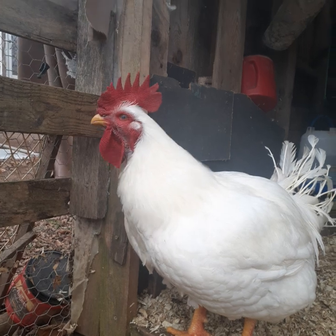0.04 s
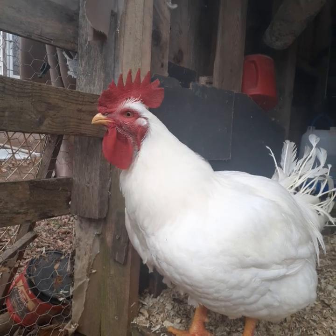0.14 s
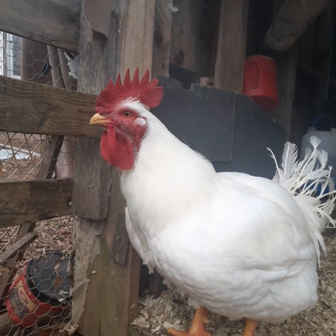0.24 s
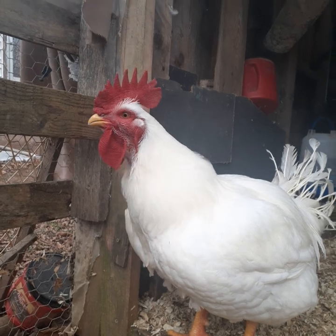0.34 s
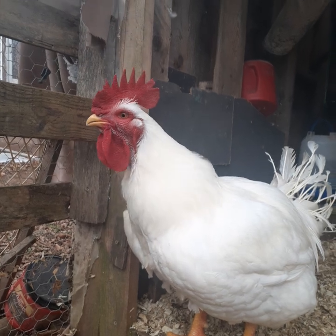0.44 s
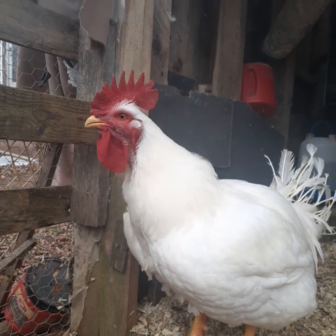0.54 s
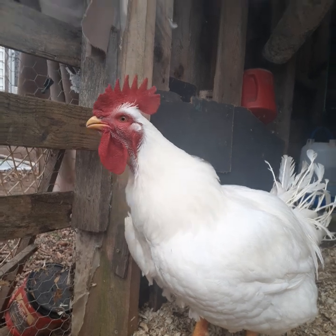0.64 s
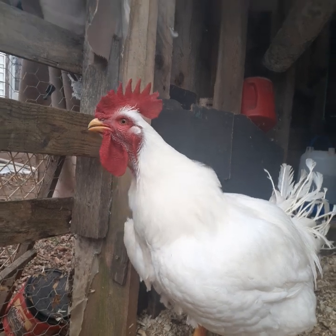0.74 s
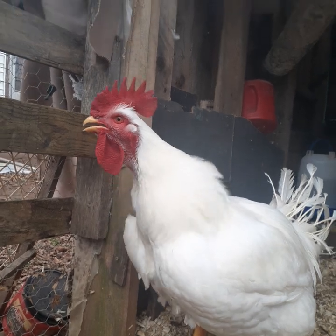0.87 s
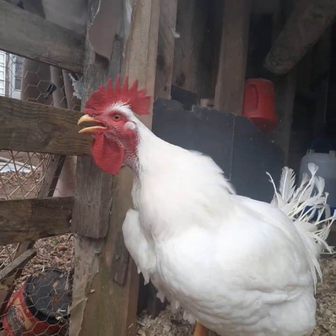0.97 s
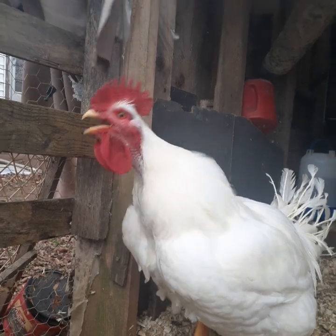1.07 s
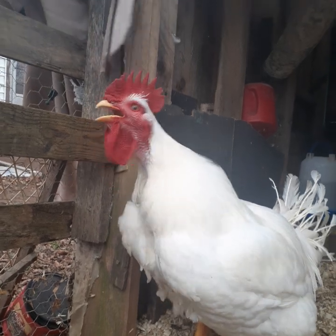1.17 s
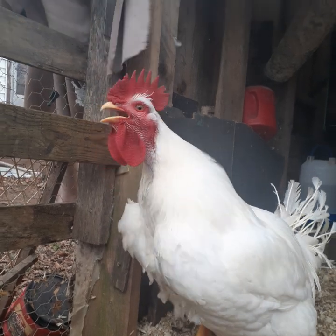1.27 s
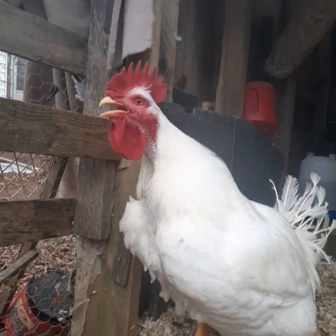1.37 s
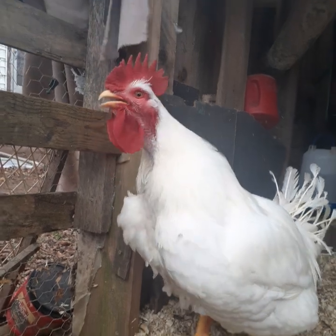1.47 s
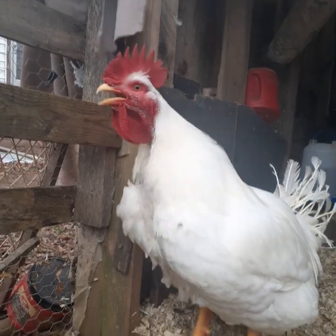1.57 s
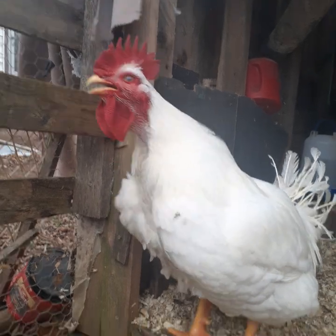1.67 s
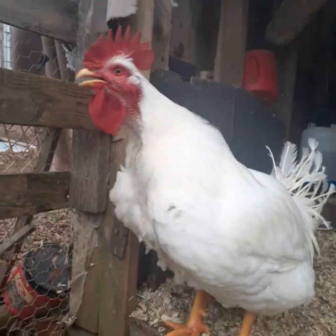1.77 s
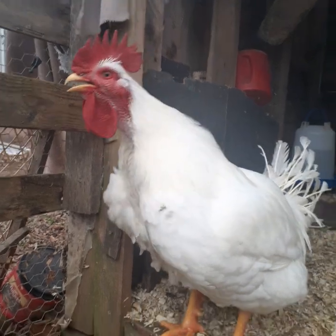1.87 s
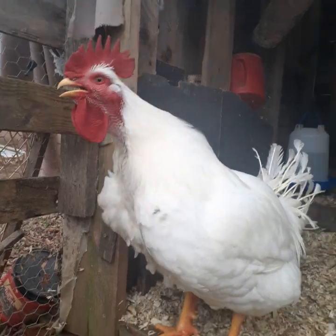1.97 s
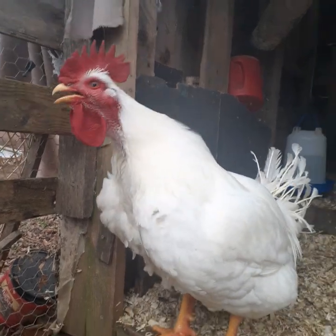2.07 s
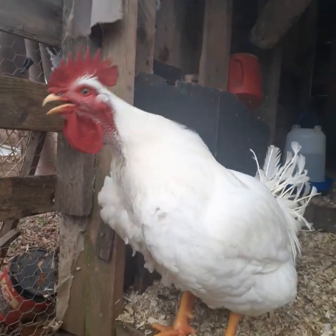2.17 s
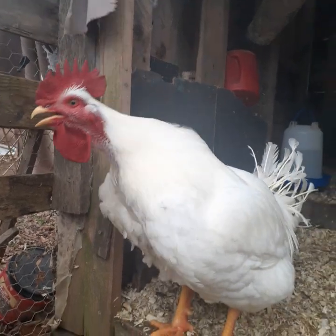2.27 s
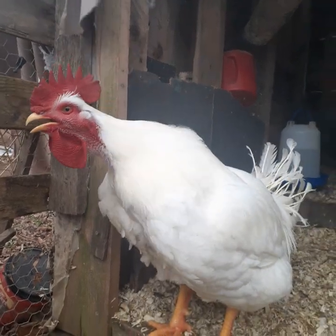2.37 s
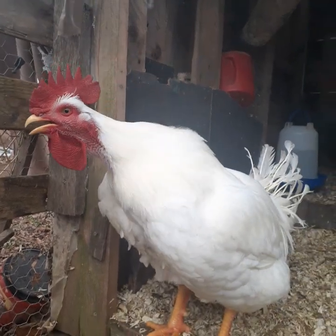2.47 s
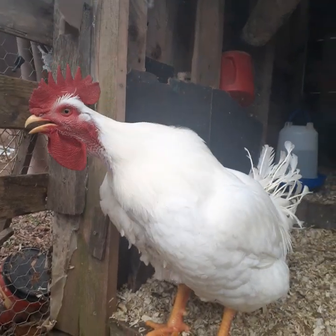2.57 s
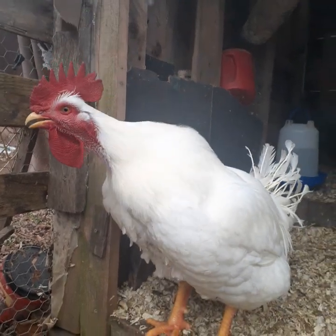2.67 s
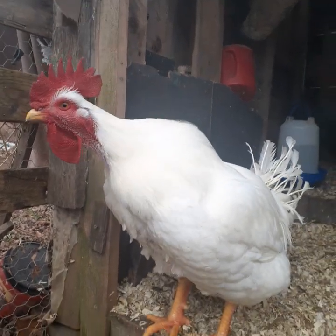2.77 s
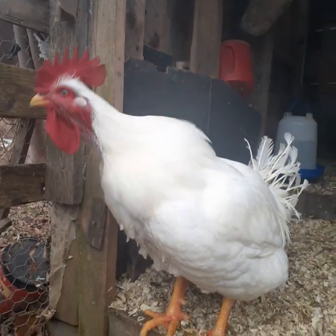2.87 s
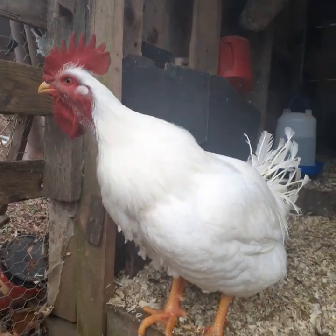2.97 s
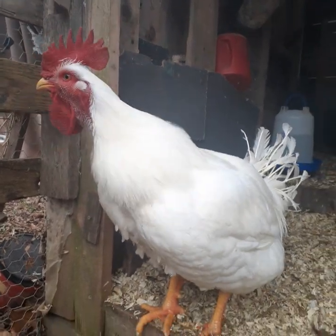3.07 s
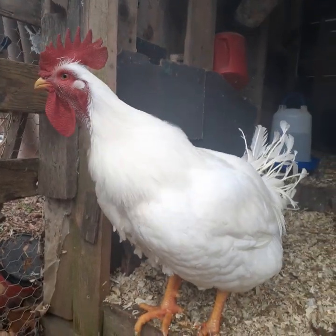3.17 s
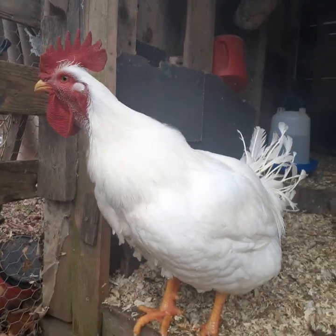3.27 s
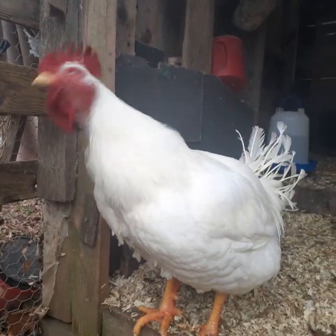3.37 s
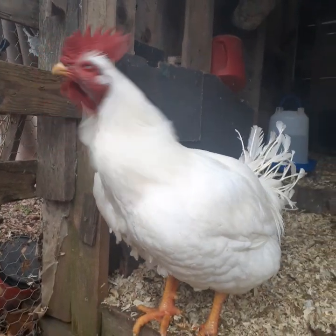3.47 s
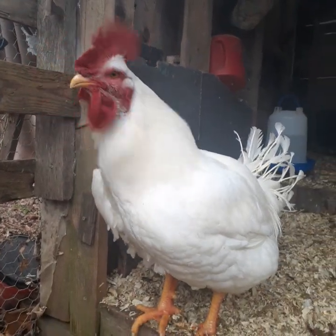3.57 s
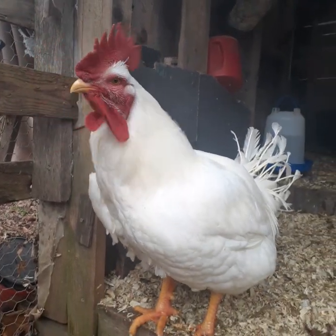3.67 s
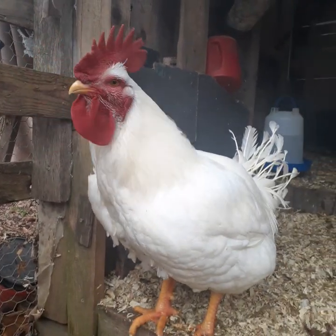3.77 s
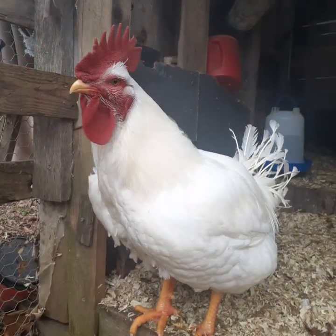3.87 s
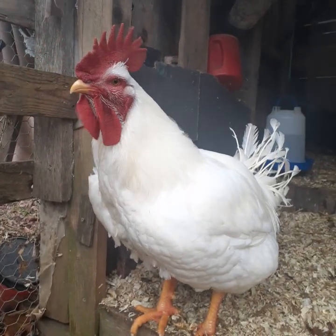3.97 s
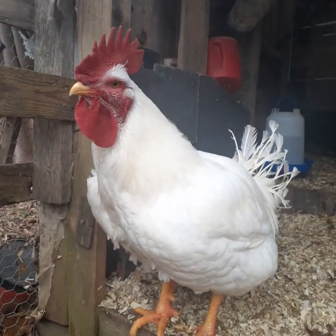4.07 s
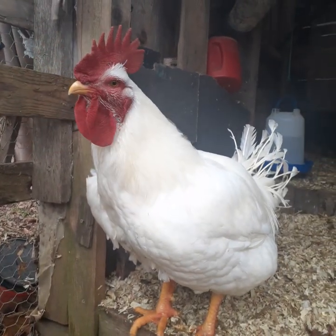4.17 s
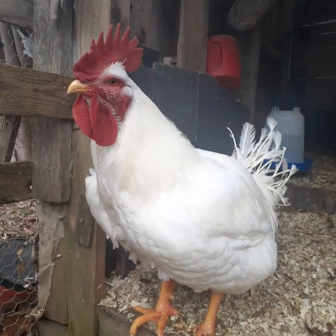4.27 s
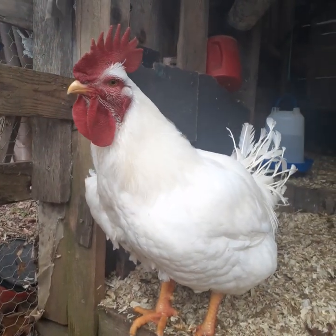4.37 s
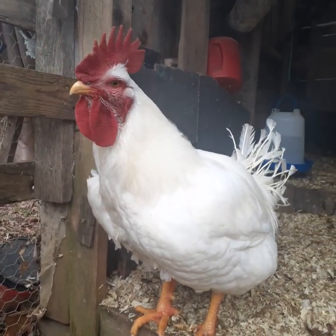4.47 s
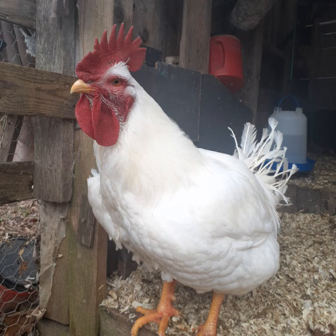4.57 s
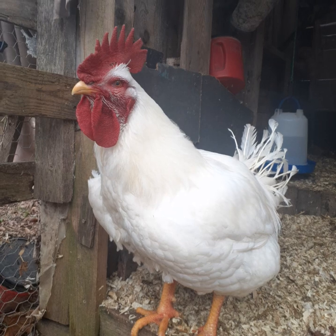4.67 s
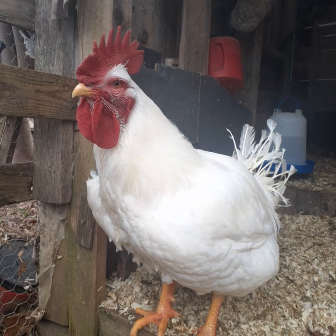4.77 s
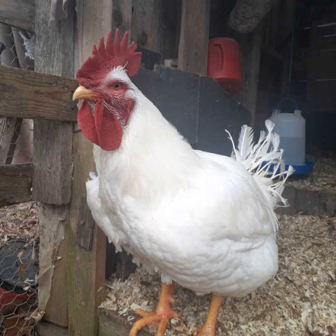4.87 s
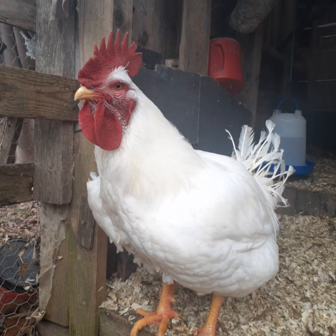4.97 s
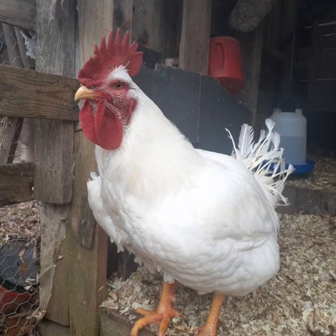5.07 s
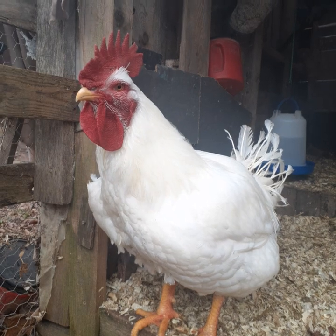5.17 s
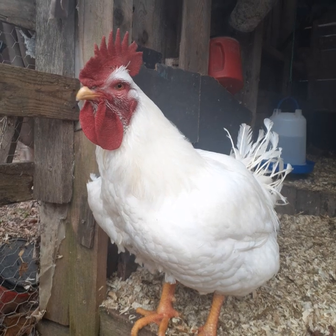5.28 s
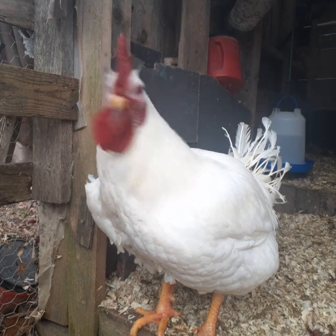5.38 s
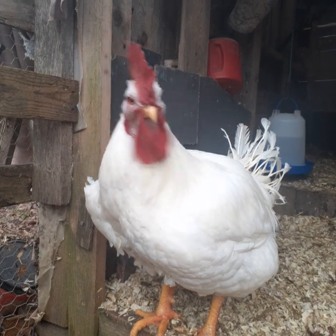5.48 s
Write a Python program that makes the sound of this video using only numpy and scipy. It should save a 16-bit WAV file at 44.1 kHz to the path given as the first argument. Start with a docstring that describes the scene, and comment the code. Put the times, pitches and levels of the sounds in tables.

```python
"""A steady low rush of outdoor noise with faint ticks of straw, then a rooster crows once, close by, at a coop door.
The rush is shaped noise, part of it common to both ports; each tick is a tiny ringing burst of noise.
The syrinx pulses swing between clean tone and hoarse, cracking vibration; throat and beak resonances shape
them, and decaying noise echoes them off the boards.
The recorder's gain control ducks at the crow, holds, and creeps back up."""
import sys
import numpy as np
from scipy import signal
from scipy.fft import rfft, irfft, next_fast_len
from scipy.io import wavfile
from scipy.ndimage import uniform_filter1d, minimum_filter1d

SR = 44100
rng = np.random.default_rng(int(sys.argv[2]) if len(sys.argv) > 2 else 0)


def to_wav(sig):
    """Store sig (one row per channel, or 1-D mono) as 16-bit WAV at the path in sys.argv[1].

    Samples outside -1..1 are clipped; the rate is SR.
    """
    pcm = np.clip(np.atleast_2d(sig), -1, 1) * 32767
    pcm = np.round(pcm).astype(np.int16)
    wavfile.write(sys.argv[1], SR, pcm.T)  # frames by channels


N = 243782
TIME = np.arange(N) / SR
SIZE = next_fast_len(N)
BINS = np.maximum(np.arange(SIZE // 2 + 1) * SR / SIZE, 1)  # frequency of each bin in Hz

# The notes of the crow; after the first, each syllable slips into a softer note, and the second ends in a grunt.
# Each row: start (full pressure) in seconds, end in seconds, beak closing before the end in seconds,
# release to -60 dB in seconds, relative level in dB, then extra dB of throat, mouth and beak.
NOTES = [(1.127, 1.351, .015, .1, -19.5, -.5, 3, 1), (1.503, 1.569, 0.0012, .07, -21, 1.5, -1.5, .5),
         (1.58, 1.63, 0.0058, 0.28, -27.5, -6.5, 7, 6), (1.64, 1.642, .028, 0.15, -21.5, 2.5, 2.5, -1),
         (1.718, 2.079, 0.00082, 0.47, -20.5, 1.5, -3, -2.5),
         (2.094, 2.263, .001, 0.02, -22.5, -3, 1.5, -5.5),
         (2.246, 2.595, 0.00089, 0.19, -25.5, 3.5, 4.5, 3.5), (2.616, 2.861, 0.087, 0.01, -25.5, 2.5, 2, 6)]
# before the last syllable the voice breaks into a lower, weaker register
BREAK_START_S, BREAK_END_S = 2.192, 2.256


def undb(db):
    """Decibels to gain."""
    return 10 ** (np.asarray(db) / 20)


def unit(x):
    """Scale to rms 1."""
    return x / np.sqrt(np.mean(x ** 2))


def curve(points):
    """(seconds, value) points joined by straight lines in time."""
    s, value = np.transpose(points)
    return np.interp(TIME, s, value)


def across(points):
    """(Hz, value) points joined on a log-frequency axis."""
    hz, value = np.transpose(points)
    return np.interp(np.log(BINS), np.log(hz), value)


def shape(x, response):
    """Filter by a frequency response."""
    return irfft(rfft(x, SIZE) * response, SIZE)[..., :N]


def resonances(modes):
    """Response of steep resonances side by side, each one a simple resonance squared."""
    return sum(undb(db) / (1 + 1j * (BINS ** 2 - hz ** 2) / (BINS * width)) ** 2 for hz, width, db in modes)


def noise():
    """White noise of rms 1."""
    return rng.standard_normal(N)


def flutter(top_hz):
    """Random motion of rms 1, mostly slower than top_hz."""
    return unit(shape(noise(), 1 / (1 + (BINS / top_hz) ** 4)))


def steady(x, count=700):
    """Even out the slow level and keep the fast roughness; count is the averaging time in samples."""
    power = uniform_filter1d(uniform_filter1d(x ** 2, count), count)
    return x / np.sqrt(np.maximum(power, 1e-12))


def stretches(rows, switch_s=0.02):
    """Hold each (start, end, value) row, with short ramps at both ends."""
    total = 0
    for start, end, value in rows:
        inside_s = np.minimum(TIME - start, end - TIME)
        total = total + value * np.clip(inside_s / switch_s + .5, 0, 1)
    return total


def rush(start_db=-38, rise_db_per_s=0.33, lag_s=0.00042, left_db=2, waver_db=0.62):
    """Low, even outdoor noise; part arrives from the open left side, the rest from all around."""
    # Spectrum of the rush. Each row: frequency in Hz, relative density in dB per Hz.
    spectrum = [(15, -55), (25, -23), (52, -10.5), (75, 1), (169, -4), (240, -3), (445, -10), (552, -11),
                (1050, -18.5), (1710, -23.5), (5430, -34.5), (7300, -35.5), (9050, -44), (12500, -44),
                (15500, -60)]
    # How alike the two ports hear it. Each row: frequency in Hz, share of the power common to both (0-1).
    common_share = [(60, 0.97), (300, 0.93), (1000, 0.3), (4000, 0.071), (12000, 0.28)]
    common = np.clip(across(common_share), 0, 1)
    right_delay = np.exp(-2j * np.pi * BINS * lag_s)
    direct = shape(noise(), np.sqrt(common) * np.array([np.ones_like(BINS), right_delay]))
    diffuse = shape(np.array([noise(), noise()]), np.sqrt(1 - common))
    treble_lift_db = 0.83 * BINS / (BINS + 600)
    air = unit(shape(direct + diffuse, undb(across(spectrum) + treble_lift_db)))
    level_db = start_db + rise_db_per_s * TIME + waver_db * flutter(3.0)
    return air * undb(level_db + np.array([[left_db], [-left_db]]) / 2)


def straw(spread=0.72):
    """Dry stalks snap under the bird: tiny bursts that die at once; spread is width over pitch."""
    # Ticks in the straw. Each row: start in seconds, peak before the gain control in dB, pitch in Hz,
    # decay of the exciting burst in seconds.
    ticks = [(0.356, -37.5, 6670, 0.0034), (.4465, -48, 9000, 0.024), (.8286, -41, 7940, 0.0028),
             (1.001, -37, 9300, 0.0014), (1.0283, -41, 12000, 0.0061), (3.4968, -42, 4500, 0.0043),
             (3.9728, -30.5, 3960, 0.0036), (4.239, -40.5, 6430, 0.0054), (4.9968, -46, 4500, .003)]
    out = np.zeros((2, N))
    for s, db, hz, decay_s in ticks:
        envelope = np.exp(-np.abs(TIME - s) / decay_s) * (TIME >= s)
        burst = envelope * np.array([noise(), noise()])
        tick = shape(burst, resonances([(hz, spread * hz, 0)]))
        out += undb(db) * tick / np.abs(tick).max()
    return out


def pressure_db(start, end, release_s, attack_db_per_s=1500.5):
    """Attack, hold and release of the air pressure behind one note; the attack leads up to the start."""
    attack_db = -attack_db_per_s * np.maximum(start - TIME, 0)
    return attack_db - 60 * np.maximum(TIME - end, 0) / release_s


def voice(break_hz=475.5, break_steepness=5, clean_rough=0.022, falter_rough=0.6):
    """Pitch, roughness and how far the voice has broken; it roughens while pressure builds or dies."""
    # Pitch of the syrinx, one curve a syllable. Each row of a curve: time in seconds, pitch in Hz.
    syllables = [
        [(1.135, 636.7), (1.157, 701), (1.207, 692.3), (1.245, 705.4), (1.273, 690.4), (1.335, 681),
         (1.345, 608), (1.36, 602)],
        [(1.5, 657.4), (1.54, 758.5), (1.6, 725.6), (1.62, 712), (1.636, 635), (1.644, 576), (1.656, 460),
         (1.668, 389)],
        [(1.715, 635), (1.755, 724), (1.825, 678.4), (1.899, 642.6), (1.961, 699.4), (2.063, 690.6),
         (2.158, 683.7)],
        [(2.26, 661), (2.3, 672.2), (2.48, 665), (2.67, 633), (2.81, 588.3), (2.834, 548), (2.836, 540.1),
         (2.848, 469), (2.875, 346)],
    ]
    # Hoarse stretches. Each row: start in seconds, end in seconds, added roughness (0-1).
    hoarse = [(1.10, 1.143, 0.77), (1.143, 1.335, 0.19), (1.335, 1.39, 0.44), (1.533, 1.552, 0.22),
              (1.635, 1.725, 0.37), (1.812, 1.965, 0.27), (2.04, 2.09, .3), (2.09, 2.197, 0.6),
              (2.197, 2.25, 0.16), (2.25, 2.36, .25), (2.53, 2.59, 0.17), (2.69, 2.86, 0.15)]
    through = (2 * TIME - BREAK_START_S - BREAK_END_S) / (BREAK_END_S - BREAK_START_S)  # -1 to 1
    broken = 1 - np.minimum(np.abs(through), 1) ** break_steepness
    sung_hz = curve([point for syllable in syllables for point in syllable])
    hz = sung_hz + broken * (break_hz - sung_hz)
    notes_db = [pressure_db(start, end, release_s) for start, end, _, release_s, *_ in NOTES]
    pressure = undb(np.max(notes_db, axis=0))
    rough = clean_rough + stretches(hoarse) + falter_rough * (1 - pressure) ** 2
    return hz, np.clip(rough, 0, 1), broken


def cracks(crack_s=0.002):
    """How far the membranes have lost their swing before catching again, 0-1."""
    # Moments of cracking. Each row: centre in seconds, depth (0-1).
    slips = [(1.133, 0.68), (1.23, 0.88), (1.243, 0.87), (1.543, 0.77), (1.843, 0.44), (1.903, 0.78),
             (1.962, 0.6), (2.04, 0.4), (2.083, 0.71), (2.1, .8)]
    return np.clip(sum(depth * np.exp(-((TIME - s) / crack_s) ** 2) for s, depth in slips), 0, .95)


def beating(break_beat_hz=168.6, rise_hz_per_s=200):
    """On both sides of the break the swing grows and shrinks, as if a second swing beat against it."""
    # Stretches of beating. Each row: start in seconds, end in seconds, depth (0-1).
    beats = [(2.09, 2.195, .42), (2.258, 2.365, 0.45)]
    beat_hz = break_beat_hz + rise_hz_per_s * (TIME - BREAK_START_S)
    beat_cycles = np.cumsum(beat_hz * (1 + 0.059 * flutter(54))) / SR
    return 1 + stretches(beats) * np.cos(2 * np.pi * beat_cycles)


def syrinx(hz, rough, crack_slip=0.24, shimmer=1.0, crack_rasp=4.5, limp=0.015, count=36):
    """Membranes slap shut once a cycle; when hoarse, the cycles slip in time and size and the air jet hisses."""
    slip, jitter, rasp_db, air_db = .042, .07, -15, -45  # share of pitch, cycles, then jet levels
    crack = cracks()
    hz = hz * (1 + 0.00088 * flutter(40) + slip * rough * flutter(110) - crack_slip * crack ** 2)
    phase = 2 * np.pi * (np.cumsum(hz) / SR + jitter * rough * flutter(280))
    # alternate cycles come early and late, which puts faint lines between the upper harmonics
    phase = phase + limp * flutter(6.4) * np.cos(phase / 2)
    pulses = sum(np.cos(k * phase) * (k * hz < SR / 2) for k in range(1, count))
    # the swing is already at its limit, so shimmer can only make it falter
    size = np.exp(-shimmer * rough * flutter(160) ** 2) * (1 - crack) * beating()
    jet = unit(noise() * (1 + 0.21 * np.cos(phase)))
    jet_gain = undb(rasp_db) * (rough + crack_rasp * crack) + undb(air_db)
    return unit(pulses) * size + jet_gain * jet


def cavity(source, modes, rough, most_strain=.72, strain_rough=0.2):
    """Ring a group of resonances whose balance shifts as the voice strains and turns hoarse."""
    strain = min(most_strain, 1) * np.tanh(rough / strain_rough)
    strained = shape(source, resonances([(hz, width, db) for hz, width, db, _ in modes]))
    eased = shape(source, resonances([(hz, width, db) for hz, width, _, db in modes]))
    return steady(strain * strained + (1 - strain) * eased)


def note_levels(start, end, closing_s, release_s, level_db, throat_db, mouth_db, beak_db):
    """Relative dB of windpipe, throat, mouth, beak and edge in one note, as pressure sags and the beak closes."""
    sag_db_per_s, closing_db_per_s = 2, 292
    bite_db, bite_s = 3.5, 0.045  # each note starts with a brighter treble
    age = np.maximum(TIME - start, 0)
    body = level_db + pressure_db(start, end, release_s) - sag_db_per_s * age
    muffled = body - closing_db_per_s * np.clip(TIME - end + closing_s, 0, closing_s)
    treble = muffled + bite_db * np.exp(-age / bite_s)
    return [body, body + throat_db, muffled + mouth_db, treble + beak_db, treble]


def rooster(windpipe_db=0, throat_db=9.5, mouth_db=-8, beak_db=-14, edge_db=-18.5, lowest_hz=350):
    """The pulses ring five groups of resonances, which swell with each note; the throat answers to the pitch."""
    # Resonances of the airway, from the chest outwards. Each row: frequency in Hz, width in Hz (before squaring),
    # relative level in dB when strained, relative level in dB when at ease.
    windpipe = [(554.4, 350, 4, -1.5)]
    throat = [(1414, 328, 0.00052, 0.0048)]
    mouth = [(2310, 53, -9.5, 4.5), (2890, 200, -7.5, 1.5), (3102, 180, 4, 3), (3934, 210, 2.5, -5),
             (4310, 110, -4, 3), (4570, 390, -12, -1.5)]
    beak = [(5700, 230, 3.5, -9), (6368, 480, 0.5, 4.5), (7280, 486, -5.5, -2), (7800, 270, 0.7, 2)]
    edge = [(9250, 520, 1.5, -3.5), (10950, 1200, -3.5, -1), (11850, 550, 0, 6), (13350, 540, -2.5, 3),
            (14860, 1400, -6, -6.5)]
    # Bands that side cavities of the airway swallow. Each row: centre in Hz, half-width in Hz, depth (0-1).
    hollows = [(1990, 165, 0.59), (2478, 79, 0.74), (3624, 61, 0.8), (5340, 83, 0.86)]
    hz, rough, broken = voice()
    response = 1 / np.sqrt(1 + (lowest_hz / BINS) ** 8)  # a small beak radiates little bass
    for centre, half_width, depth in hollows:
        response = response * (1 - min(depth, 1) / (1 + ((BINS - centre) / half_width) ** 4))
    source = shape(syrinx(hz, rough), response)
    swells_db = np.max([note_levels(*note) for note in NOTES], axis=0)
    break_db = -5 * broken
    bright_db = 2.5 * np.exp(-rough / .08)  # clean cycles close more sharply and sound brighter
    # the throat rings fully from 687.2 Hz up, and less the flatter he sings, unless rasp excites it
    detuned_db = np.clip(0.32 * (687.2 - hz), 0, 23.5) * (1 - rough)
    airway = [(windpipe, windpipe_db + break_db),
              (throat, throat_db + break_db - detuned_db),
              (mouth, mouth_db + break_db),
              (beak, beak_db + bright_db),
              (edge, edge_db + bright_db)]
    waver_db, waver_hz = 1.2, 20  # each group wavers on its own
    out = 0
    for (modes, group_db), swell_db in zip(airway, swells_db):
        gain = undb(group_db + swell_db + waver_db * flutter(waver_hz))
        out = out + uniform_filter1d(gain, size=220) * cavity(source, modes, rough)
    return out


def ports(x):
    """The bird stands to the left: the right microphone port hears him later and mostly weaker."""
    # Each row: frequency in Hz, radians by which the left port leads.
    left_lead = [(100, -1), (700, 0.64), (1150, 0.7), (1380, 0.56), (2000, 4), (2700, 4), (3600, 4.5),
                 (4500, 7.5), (5600, 10.5), (7000, 11), (8500, 16), (16000, 25)]
    # Each row: frequency in Hz, left minus right in dB before he leans.
    balance = [(300, 2.4), (700, 2.8), (1350, 4.8), (1600, 1), (2200, 6), (2750, 3.1), (3600, 3), (4600, 5),
               (6400, 2), (8000, 3), (12000, 4), (15000, 10)]
    tilt_db = across(balance) / 2
    left = shape(x, undb(tilt_db))
    right = shape(x, undb(-tilt_db) * np.exp(-1j * across(left_lead)))
    return np.array([left, right])


def lean(crow):
    """He leans towards the left port as the crow goes on, which shifts the balance between the ports."""
    # Each row: time in seconds, added left minus right in dB.
    leaning = [(1.9, -1), (2.55, 4.5)]
    lean_db = curve(leaning)
    return crow * undb(np.array([lean_db, -lean_db]) / 2)


def coop(x, first_s=0.0016, late_db=-15, near_t60_s=0.06, coop_t60_s=0.23):
    """Nearby boards throw back a quick flurry, the coop behind a faint tail; both differ at each port."""
    # The beak beams its treble past the microphone, so more of it arrives as echo.
    # Each row: frequency in Hz, echo level in dB relative to the crow.
    echo_tone = [(600, -20), (1400, -19), (3000, -11), (7000, -9), (14000, -6)]
    flurry = undb(-60 * TIME / near_t60_s)
    late = undb(late_db - 60 * TIME / coop_t60_s)
    tail = (flurry + late) * (TIME > first_s)
    echoes = np.array([noise() * tail, noise() * tail]) / np.sqrt(np.sum(tail ** 2))
    return shape(x, rfft(echoes, SIZE) * undb(across(echo_tone)))


def scene(crow_db=17):
    """The loud crow and its echo over the quiet yard."""
    crow = lean(ports(undb(crow_db) * rooster()))
    return rush() + straw() + crow + coop(crow)


def gain_control(x, threshold_db=-27, range_db=16.5, hold_s=0.76, release_db_per_s=17, attack_s=0.009):
    """Turn down by the excess over the threshold, up to a fixed range; hold, then recover slowly."""
    power = uniform_filter1d(np.mean(x ** 2, axis=0), size=256)
    excess = np.clip(10 * np.log10(np.maximum(power, 1e-12)) - threshold_db, 0, range_db)
    half = int(hold_s * SR / 2)
    # largest excess within the past hold time
    held = -minimum_filter1d(-excess, 2 * half + 1, origin=half, mode="nearest")
    recovery = release_db_per_s * TIME
    cut_db = np.maximum.accumulate(held + recovery) - recovery
    pole = np.exp(-1 / (attack_s * SR))
    return x * undb(-signal.lfilter([1 - pole], [1, -pole], cut_db))


def record(dry, top_hz=15850):
    """Gain control, full-scale clipping and a steep treble cut."""
    loud = np.clip(gain_control(dry), -1, 1)
    return signal.sosfilt(signal.ellip(10, .1, 80, top_hz, fs=SR, output="sos"), loud)


dry = scene()
out = record(dry)
to_wav(out)
```